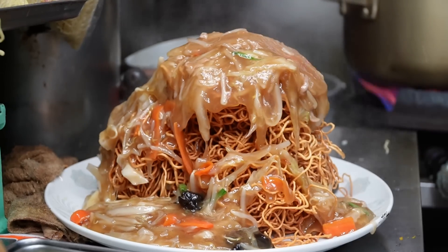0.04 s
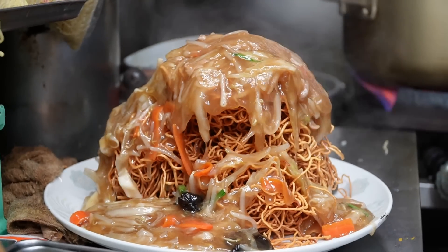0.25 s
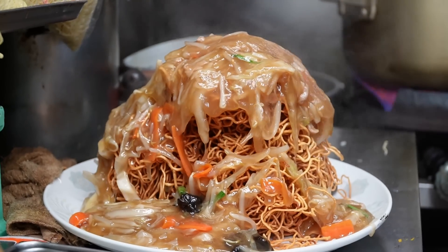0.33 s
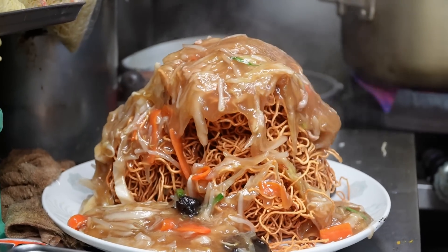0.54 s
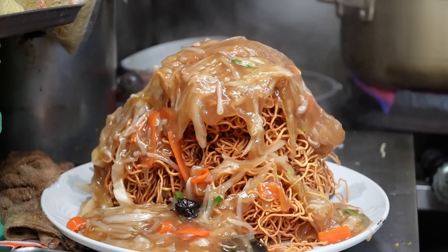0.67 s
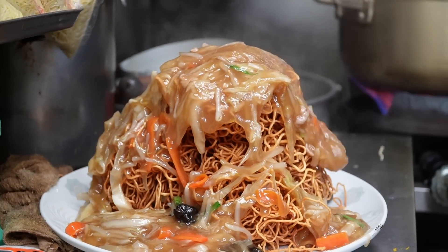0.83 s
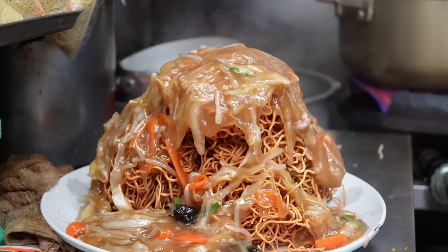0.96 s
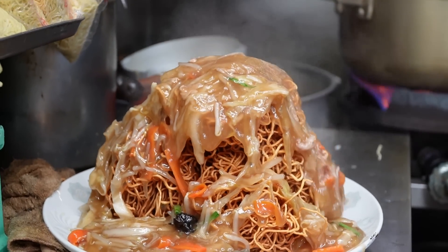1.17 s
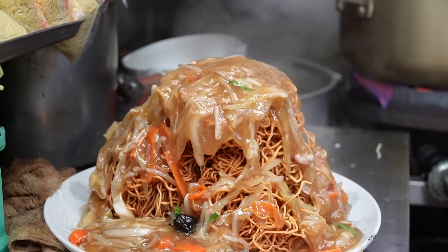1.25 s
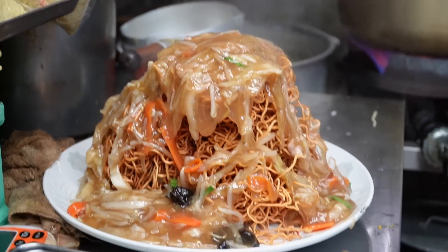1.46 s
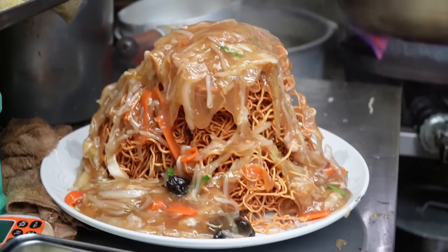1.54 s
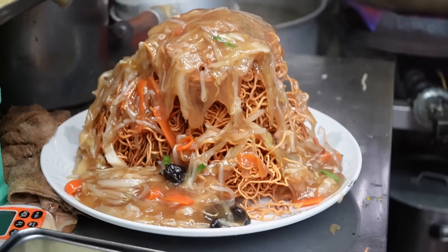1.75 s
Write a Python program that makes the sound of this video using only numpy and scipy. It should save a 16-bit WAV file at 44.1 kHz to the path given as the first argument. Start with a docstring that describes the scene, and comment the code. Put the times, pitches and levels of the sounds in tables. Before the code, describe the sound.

Loud kitchen utensil clatter, two ringing ladle raps followed by a lower double wok clank and short gritty, squeaking scrapes with more knocks, in a hard-walled restaurant kitchen with constant airy roar, picked up close in stereo.

```python
"""Burners and extractor of a hard-walled restaurant kitchen roar throughout, as coloured noise.
First a steel ladle is rapped twice on a pan rim: cracks, dense clangs and clear modes.
Then a wok clanks down on the range, made likewise, its hollow ring (a gliding sine) settling to about 770 Hz,
and the ladle scrapes round it in short strokes: trains of tiny slips, with squeals as wavering sines.
The recorder's limiter flattens the blows."""
import sys
import numpy as np
from scipy import signal
from scipy.fft import rfft, irfft
from scipy.io import wavfile

SR = 44100
rng = np.random.default_rng(int(sys.argv[2]) if len(sys.argv) > 2 else 0)


def materialize(psi):
    """Save the field psi as 16-bit PCM at rate SR to the path in sys.argv[1].

    A 1-D psi becomes a single channel; in a 2-D psi each row is a channel.
    """
    bounded = np.clip(np.atleast_2d(psi).T, -1, 1)
    quanta = np.round(bounded * 32767).astype(np.int16)
    wavfile.write(sys.argv[1], SR, quanta)


N = 79380
TIME = np.arange(N) / SR
HZ = np.maximum(np.arange(N // 2 + 1) * SR / N, 1)
ATTACK_S = 0.0047

# left-right correlation of the sound field: freq_hz, correlation_0_to_1
LIKENESS = [(150, 1), (600, 0.98), (1400, 0.94), (2800, 0.89), (5500, 0.6), (10000, 0.27)]


def from_db(db):
    """Decibels to gain."""
    return 10 ** (np.asarray(db) / 20)


def rms_one(x):
    """Scale to rms 1."""
    return x / np.sqrt(np.mean(x ** 2) + 1e-20)


def at_hz(points):
    """Read a table along log frequency."""
    hz, value = np.transpose(points)
    return np.interp(np.log(HZ), np.log(hz), value)


def drift(rate_hz):
    """Random wander of rms 1, mostly slower than rate_hz."""
    lowpass = 1 / (1 + (HZ / rate_hz) ** 2)
    return rms_one(irfft(rfft(rng.standard_normal(N)) * lowpass, N))


def noise(colour, clicks=None):
    """Coloured stereo noise of rms 1, smooth or made of clicks, alike in the bass and wide in the treble."""
    alike = np.clip(at_hz(LIKENESS), 0, 1)
    if clicks is None:
        mid, side = np.exp(2j * np.pi * rng.random((2, len(HZ))))
    else:
        mid, side = rfft(clicks)
    both = np.sqrt(1 + alike) * mid + np.sqrt(1 - alike) * side * [[1], [-1]]
    return rms_one(irfft(both * from_db(at_hz(colour)), N))


def dying(t, t60_s, hold_s=0):
    """Starts at t = 0, holds, then decays exponentially."""
    return (t >= 0) * np.exp(-np.log(1000) * np.maximum(t - hold_s, 0) / t60_s)


def tail(colour, t, t60_s, hold_s=0):
    """A crowd of close modes dying octave by octave, faster with each octave above 2 kHz."""
    treble_damping = 0.24  # t60 falls as this power of frequency
    spectrum = rfft(noise(colour))
    octave = np.clip(np.log2(HZ / 2000), -3, 3)
    out = 0
    for k in np.unique(np.round(octave)):
        band = irfft(spectrum * np.maximum(1 - abs(octave - k), 0), N)
        band_t60_s = t60_s * 2 ** (-max(k, 0) * treble_damping)
        out = out + band * dying(t, band_t60_s, hold_s)
    return out


def held(start_s, length_s, release_s):
    """Linear attack, hold, exponential release with time constant release_s."""
    t = TIME - start_s
    return np.clip(t / ATTACK_S, 0, 1) * np.exp(-np.maximum(t - length_s, 0) / release_s)


def burners_and_extractor():
    """Turbulent roar: coloured noise with a very slight level flutter."""
    # roar spectrum: freq_hz, level_db_per_hz
    roar_colour = [(35, -62), (60, -24), (115, -39), (160, -14.5), (250, -10), (295, -11), (330, -2.5),
                   (390, -10), (600, -6), (1000, -4.5), (2000, -3), (4200, -9), (8000, -20), (16000, -31)]
    level_db, flutter_db, flutter_hz = -28, 0.1, 40
    return from_db(level_db + flutter_db * drift(flutter_hz)) * noise(roar_colour)


def kitchen_echo(x):
    """Add the dense echo of tiles and steel, as decaying noise convolved with the sound."""
    delay_s, t60_s, wet = 0.004, 0.41, from_db(-3)
    echo = rms_one(tail([(100, 0.23), (16000, -2.2)], TIME - delay_s, t60_s)) / np.sqrt(N)
    echoed = signal.fftconvolve(x, echo, axes=1)[:, :N]
    return (x + wet * echoed) / np.sqrt(1 + wet ** 2)


def squeals_and_hollow_rings():
    """Squeals of the scraping edge, and the wok's hollow ring gliding down to about 770 Hz as it settles."""
    # squeals and hollow rings: start_s, length_s, pitch_hz, starting_pitch_offset_share, level_db
    tones = [(0.683, 0.044, 1487, .6, -20), (0.704, 0.083, 767, .15, -20), (0.894, 0.024, 3432, 0.27, -16),
             (1.039, 0.062, 770, 0, -24), (1.066, 0.025, 2250, -.03, -19), (1.105, .035, 2483, -.02, -22),
             (1.181, 0.063, 2162, -0.04, -17), (1.241, 0.016, 783, .02, -24.5),
             (1.342, 0.018, 2290, -0.028, -20.5), (1.384, .015, 1110, 0, -26)]
    waver_at_2khz, waver_hz = 0.022, 260  # share of the pitch, more for high notes; rate
    ring_cycles, settle_s = 25, 0.022  # time constants
    out = 0
    for start_s, length_s, pitch_hz, bend, level_db in tones:
        slide = bend * np.exp(-np.maximum(TIME - start_s, 0) / settle_s)
        waver = waver_at_2khz * pitch_hz / 2000 * drift(waver_hz)
        phase = 2 * np.pi * np.cumsum(pitch_hz * (1 + slide + waver)) / SR
        gain = np.sqrt(2) * from_db(level_db + 2 * drift(waver_hz))
        out = out + gain * held(start_s, length_s, ring_cycles / pitch_hz) * np.sin(phase)
    return out


def scrapes():
    """Dense uneven slips of the ladle's edge shake the wok: grind, grit and rumble."""
    # ladle strokes: start_s, length_s, grind_db, grit_db, rumble_db
    strokes = [(0.874, 0.021, -21, -23, -21.5), (0.895, 0.039, -15, -28.5, -46),
               (0.929, 0.054, -12, -17.5, -35), (0.987, 0.0554, -11, -18, -19.5),
               (1.048, 0.034, -15.5, -27, -39), (1.107, 0.048, -13, -18.5, -35),
               (1.186, 0.054, -20.5, -49, -58), (1.333, 0.049, -16.5, -21, -38),
               (1.422, 0.052, -20, -35, -34)]
    # spectrum of the grind: freq_hz, level_db_per_hz
    grind = [(150, -19), (500, -9.5), (1000, 2), (1700, 1.5), (2400, 2), (3000, -1.5), (3800, -0.5),
             (5500, -10), (8000, -29), (16000, -34)]
    # spectrum of the gritty hiss: freq_hz, level_db_per_hz
    grit = [(1500, -39), (3500, -5.5), (5500, -0.5), (7500, -8), (10000, -9), (16000, -20.5)]
    # spectrum of the bowl's rumble: freq_hz, level_db_per_hz
    rumble = [(70, -8), (170, -5), (280, 3), (450, 5), (750, 4.5), (1200, 2.5), (2500, -20.5)]
    release_s, slips_per_s, slip_spread_db = 0.0063, 4500, 3
    out = 0
    for k, colour in enumerate((grind, grit, rumble)):
        size_db = slip_spread_db * np.minimum(rng.exponential(1, (2, N)), 4)
        sizes = from_db(size_db) * rng.choice([-1, 1], (2, N))
        slips = sizes * (rng.random((2, N)) < slips_per_s / SR)
        power = 0
        for start_s, length_s, *levels_db in strokes:
            power = power + (from_db(levels_db[k]) * held(start_s, length_s, release_s)) ** 2
        out = out + np.sqrt(power) * noise(colour, slips)
    return out


def blows(rows, modes, colour, crowd_db, hold_s, t60_s, crack_db, ring_db):
    """Each blow is a crack, a dense clang held up by chatter and close echoes, and the clear modes."""
    crack_t60_s, mode_spread_db = 0.017, 2
    hz, mode_db, mode_t60_s = np.transpose(modes)[:, :, None]
    width = np.sqrt(np.clip(1 - np.interp(hz, HZ, at_hz(LIKENESS)), 0, 1) / 2)
    # first contact: brighter by 10 dB per decade
    crack_colour = [(f, d + 10 * np.log10(f / 1000)) for f, d in colour]
    out = 0
    for start_s, level_db in rows:
        t = TIME - start_s
        strength, apart, turn = rng.standard_normal((3, len(modes), 1))
        swing = from_db(mode_db + ring_db + mode_spread_db * strength) * dying(t, mode_t60_s, hold_s)
        phase = 2 * np.pi * (hz * t + turn)
        # left and right differ in phase, most in the treble
        rings = np.array([(swing * np.sin(phase + side * apart * width)).sum(0) for side in (1, -1)])
        crack = from_db(crack_db) * noise(crack_colour) * dying(t, crack_t60_s)
        crowd = from_db(crowd_db) * tail(colour, t, t60_s, hold_s)
        out = out + from_db(level_db) * (rings + crack + crowd)
    return out


def wok_knocks():
    """The wok clanks on the range: its modes ring over a crowd of close ones."""
    # knocks: start_s, level_db
    knocks = [(0.6828, -1.5), (0.694, -2), (0.8768, -7.5), (1.051, -8), (1.109, -4.5), (1.200, -9.5),
              (1.428, -15.5)]
    # clear modes of the wok: freq_hz, level_db, t60_s
    modes = [(769, -25, .6), (250, -23, .07), (1249, -21, .25), (1369, -22, .4), (1525, -21, .25),
             (1634, -23, .3), (1830, -21, .35), (2452, -17, .15), (2626, -22, .35), (3400, -20, .2)]
    # spectrum of its crowd of close modes: freq_hz, level_db_per_hz
    colour = [(100, -29), (240, -12.5), (450, -9.5), (850, -8.5), (1100, -6.5), (1600, -1), (2500, -1),
              (4200, -3.5), (6500, -17.5), (16000, -38.5)]
    return blows(knocks, modes, colour, crowd_db=-11.5, hold_s=0.036, t60_s=0.37, crack_db=-14, ring_db=-3.5)


def rim_raps():
    """The ladle raps the pan rim: a strong crack and a bright, long-held clang."""
    # raps, the middle one very faint: start_s, level_db
    raps = [(0.2388, -1.5), (0.310, -39), (0.4155, -5)]
    # clear modes a rap rings with: freq_hz, level_db, t60_s
    modes = [(488, -25, .25), (1150, -22, 1.1), (1340, -25, 1.1), (1818, -21, .4), (1889, -16, .4),
             (2430, -18, .3), (2746, -15, .33), (2952, -13, .33), (3036, -12, .33), (3511, -11, .27),
             (3740, -13, .25), (3804, -12, .25), (4462, -14, .27), (4506, -16, .27)]
    # spectrum of its crowd of close modes: freq_hz, level_db_per_hz
    colour = [(150, -51), (480, -12), (800, -22.5), (1700, -17.5), (2400, -6.5), (2900, -1), (3250, -9.5),
              (3650, 4), (4100, -9.5), (4500, -3), (5200, -10.5), (5700, -10), (6500, -16), (10000, -23),
              (16000, -33)]
    return blows(raps, modes, colour, crowd_db=-6.5, hold_s=0.065, t60_s=0.3, crack_db=2.5, ring_db=-7.5)


def scene():
    """Cookware with little bass, slightly to the right, over the steady roar."""
    low_cut_hz, left_db = 140, -1.12
    low_cut = signal.butter(6, low_cut_hz, "high", fs=SR, output="sos")
    cookware = rim_raps() + wok_knocks() + kitchen_echo(scrapes()) + squeals_and_hollow_rings()
    cookware = signal.sosfilt(low_cut, cookware)
    return cookware * from_db([[left_db], [0]]) + burners_and_extractor()


def record(dry):
    """A fast limiter, rounded peaks, a rumble filter and a steep top cut."""
    limit_db, slope, sense_s, release_db_per_s = -12, 0.64, 0.0034, 69
    rumble_cut_hz, stopband_hz = 45, 16700
    r = np.exp(-1 / (sense_s * SR))
    power = signal.lfilter([1 - r], [1, -r], np.mean(dry ** 2, 0))
    level_db = 10 * np.log10(power + 1e-12)
    # excess rises with the sensed level, falls at a steady rate
    fall_db = release_db_per_s * TIME
    over_db = np.maximum.accumulate(np.maximum(level_db - limit_db, 0) + fall_db) - fall_db
    limited = dry * from_db(-slope * over_db)
    rounded = limited / (1 + limited ** 6) ** (1 / 6)
    rumble_filter = signal.butter(2, rumble_cut_hz, "high", fs=SR, output="sos")
    top_cut = signal.cheby2(16, 70, stopband_hz, fs=SR, output="sos")
    return signal.sosfilt(top_cut, signal.sosfilt(rumble_filter, rounded))


dry = scene()
out = record(dry)
materialize(out)
```